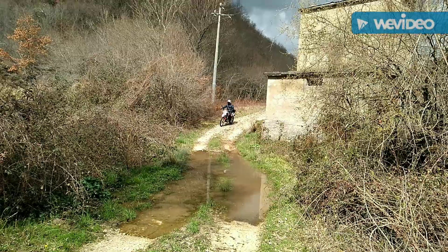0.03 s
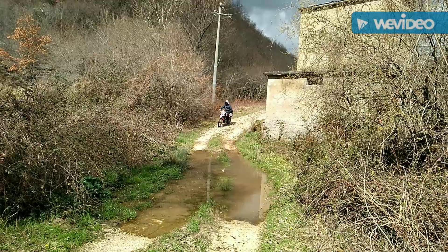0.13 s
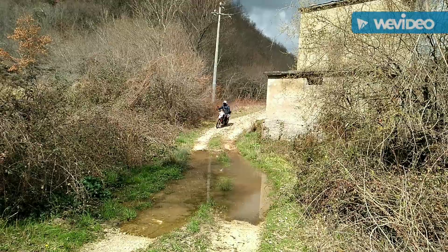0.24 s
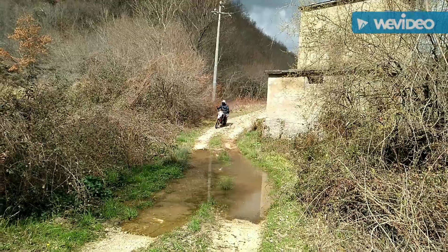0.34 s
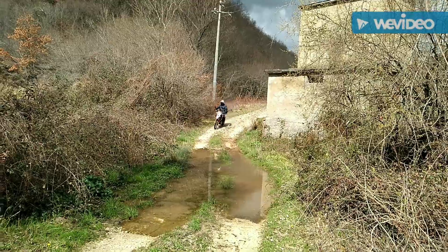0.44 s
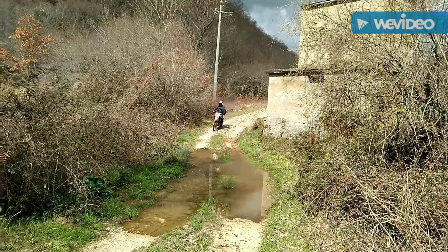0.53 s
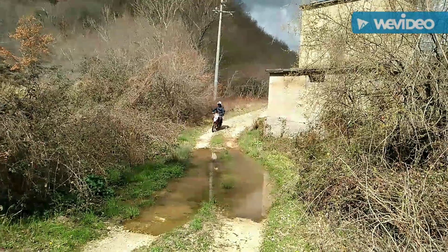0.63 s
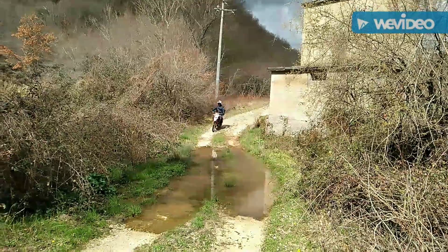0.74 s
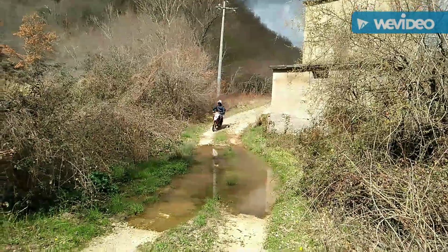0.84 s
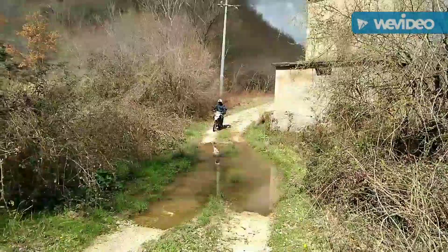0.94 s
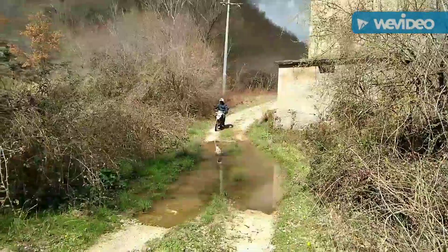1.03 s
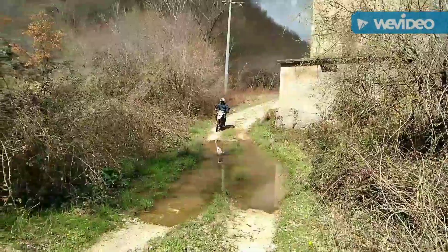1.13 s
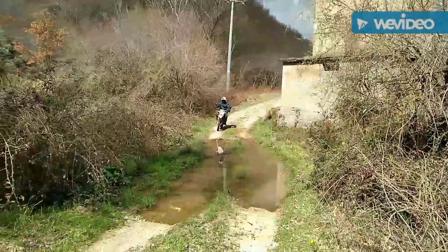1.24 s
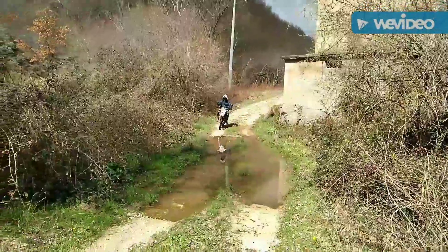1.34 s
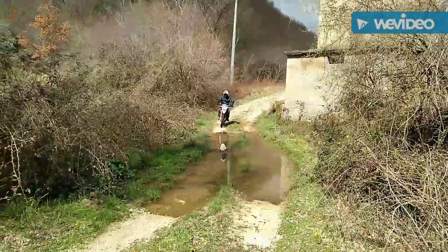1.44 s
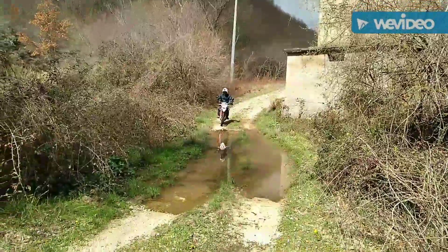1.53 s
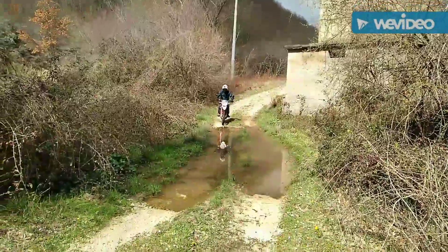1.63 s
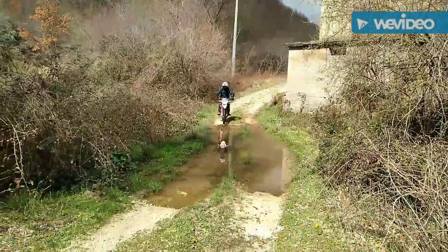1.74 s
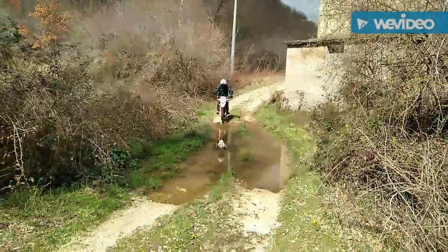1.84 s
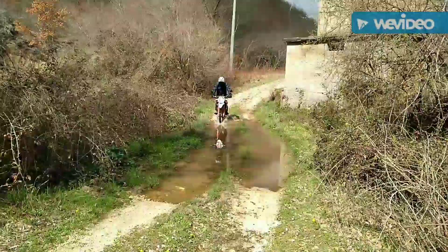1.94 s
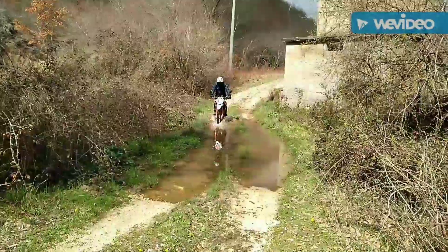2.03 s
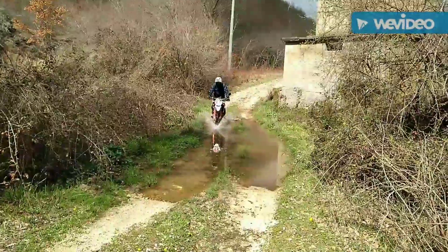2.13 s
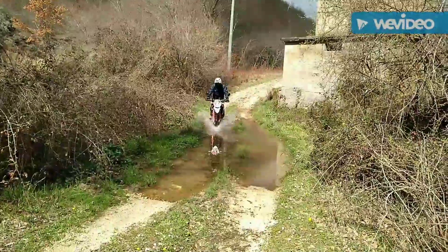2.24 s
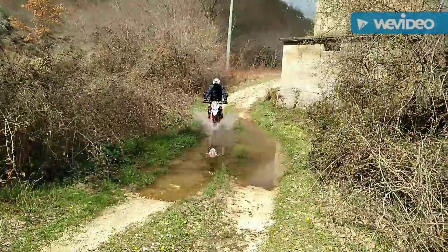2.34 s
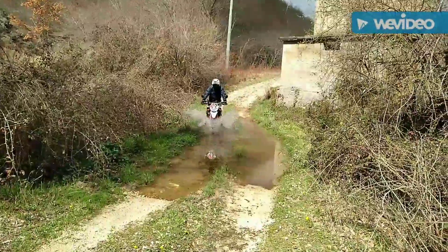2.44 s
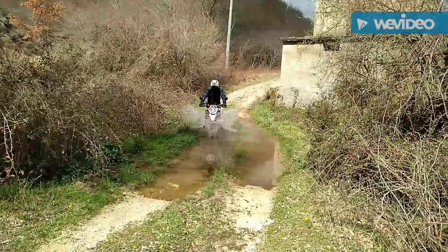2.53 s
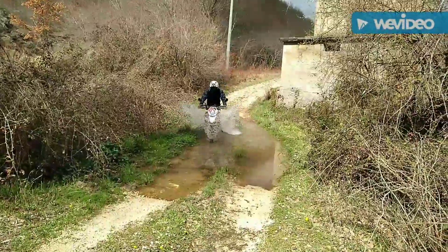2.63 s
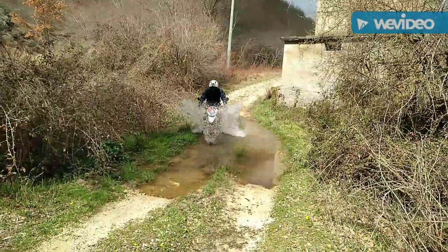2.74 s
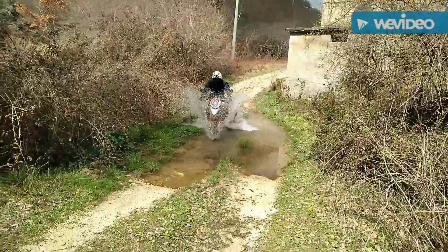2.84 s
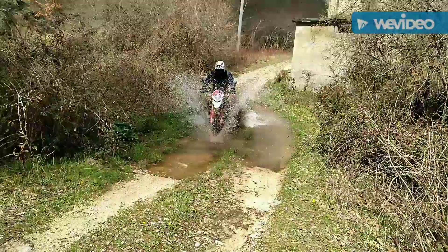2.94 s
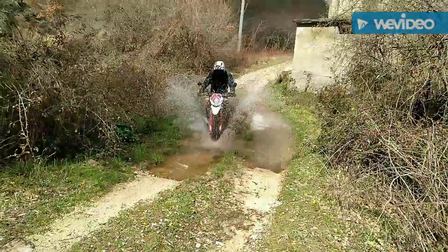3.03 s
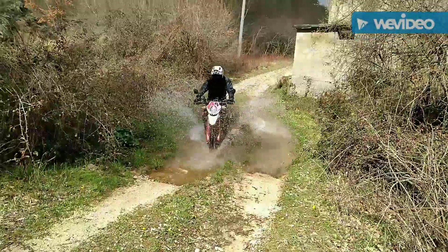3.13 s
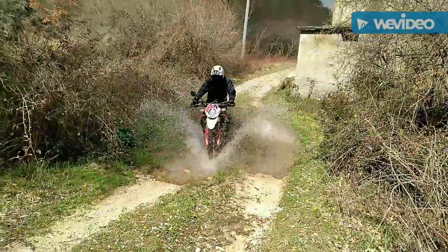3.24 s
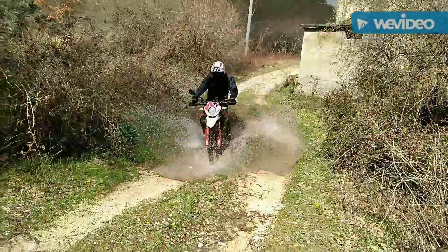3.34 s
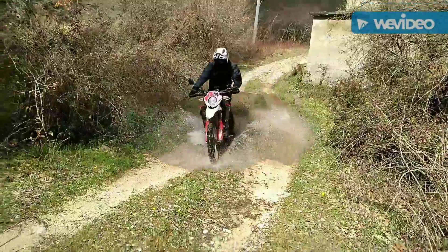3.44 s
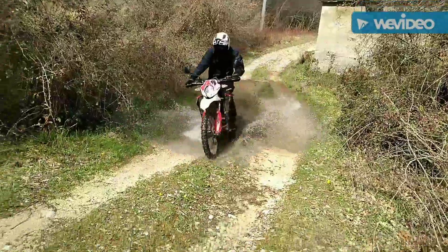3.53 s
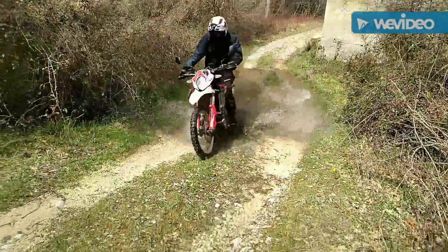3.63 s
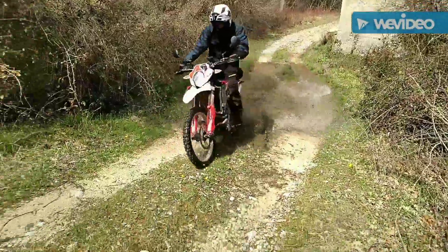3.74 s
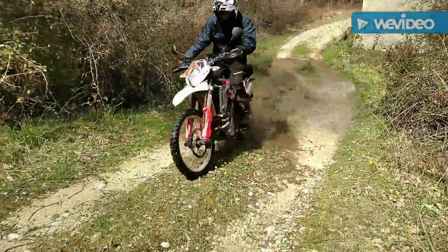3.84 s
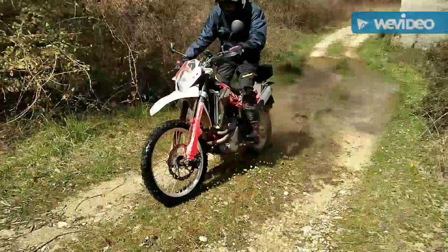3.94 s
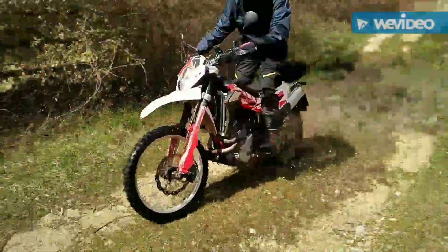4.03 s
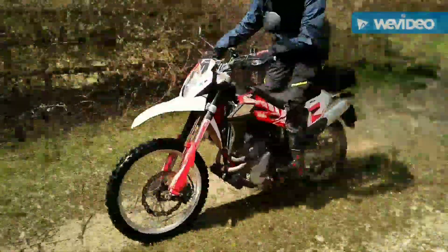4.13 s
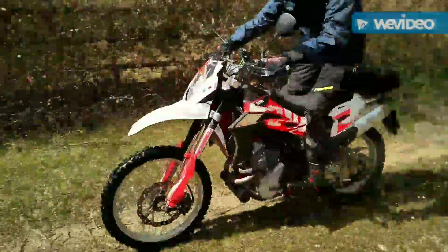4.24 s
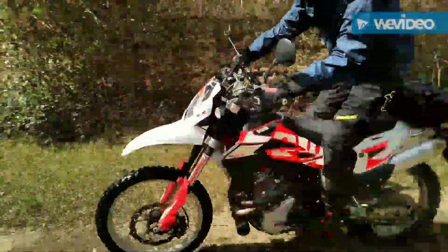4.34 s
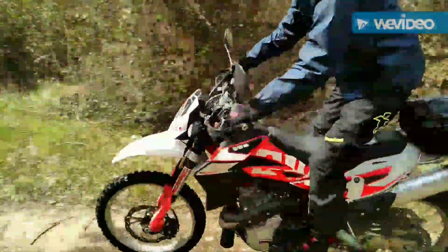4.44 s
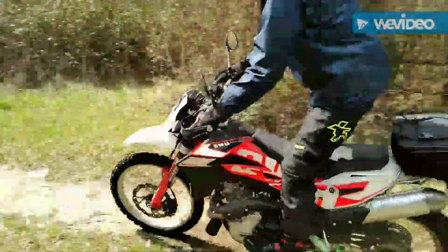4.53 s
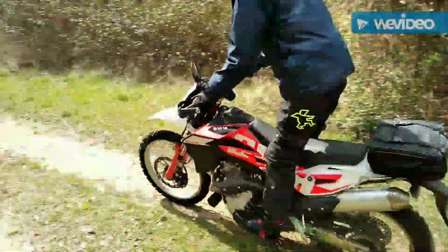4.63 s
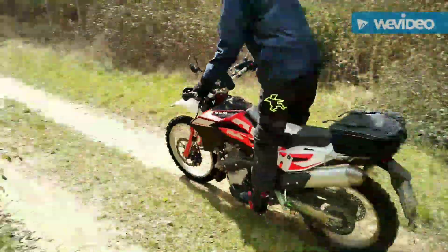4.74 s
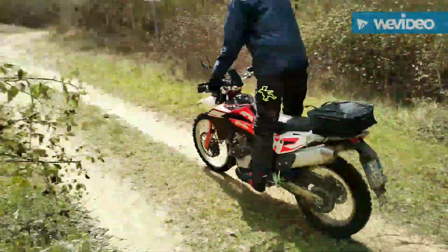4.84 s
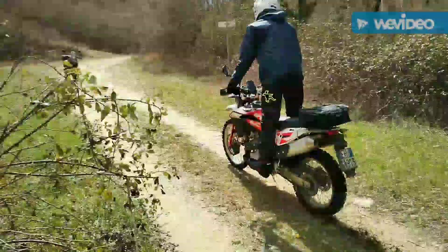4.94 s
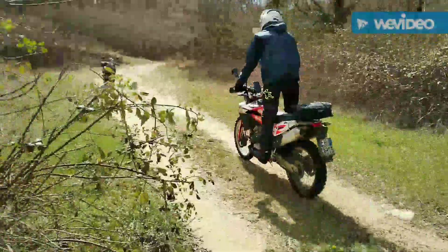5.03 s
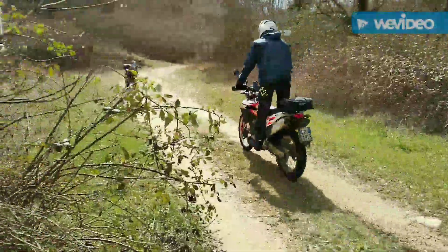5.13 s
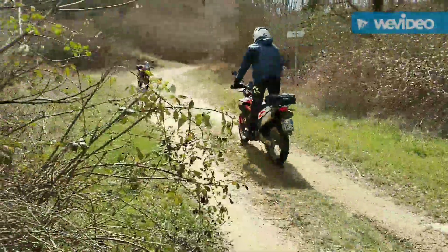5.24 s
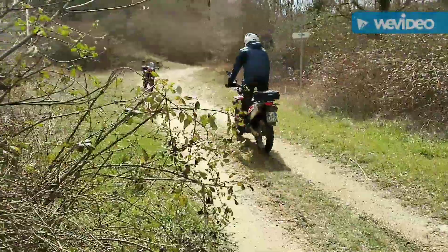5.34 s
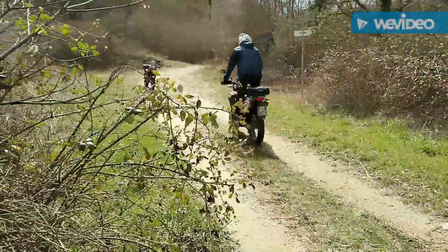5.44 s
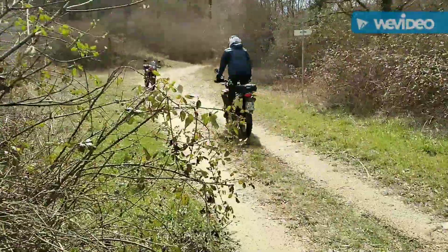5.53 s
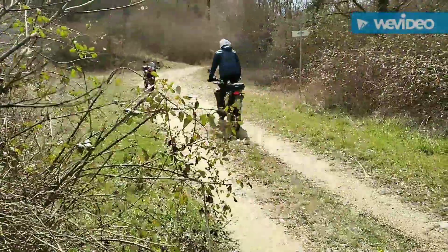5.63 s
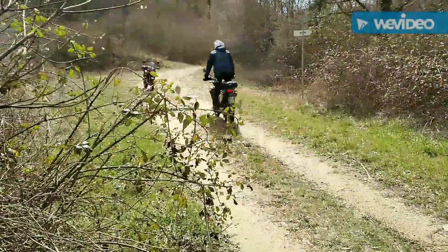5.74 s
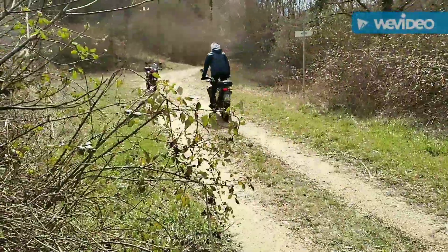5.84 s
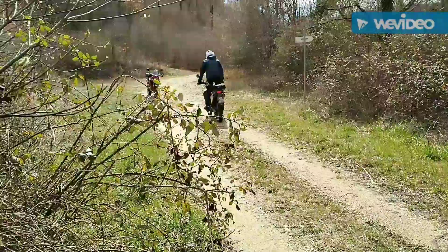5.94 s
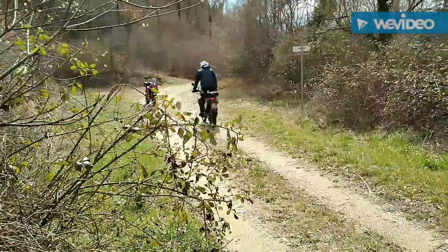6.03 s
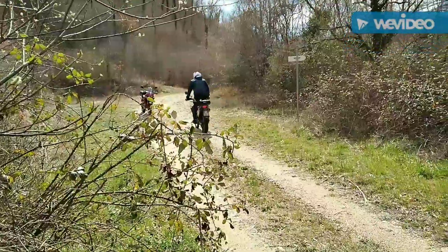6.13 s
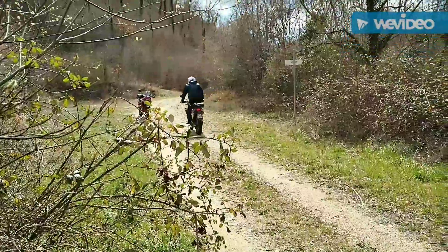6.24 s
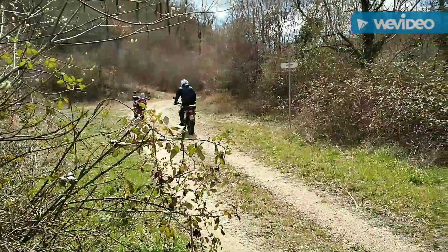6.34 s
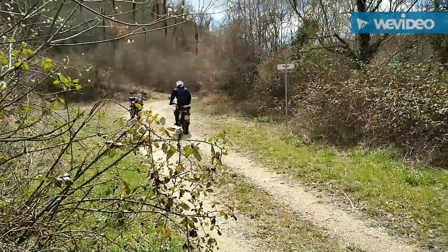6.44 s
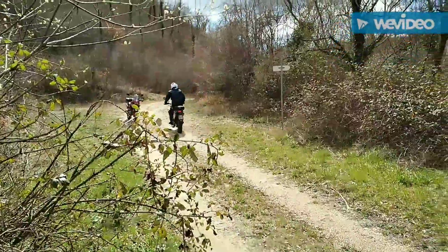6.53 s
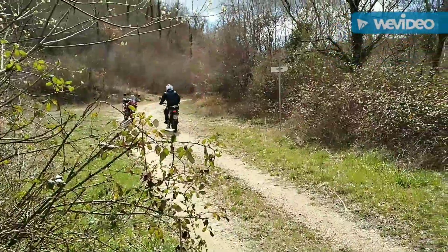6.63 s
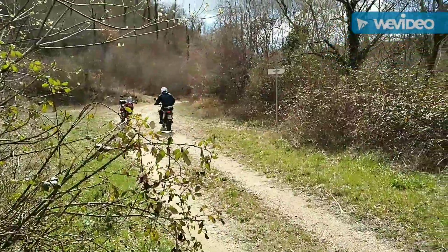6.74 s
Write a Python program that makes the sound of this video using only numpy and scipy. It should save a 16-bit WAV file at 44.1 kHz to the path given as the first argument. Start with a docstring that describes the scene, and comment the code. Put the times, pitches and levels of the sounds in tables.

```python
"""Trail motorcycle through a puddle

Beside a dirt track, open air, one microphone. A single-cylinder bike comes in from a distance, ploughs
through a long puddle, passes close and coasts away, throttle shut, firing unevenly. Each firing thumps
in the silencer, barks in the header pipe and clacks in the cylinder; unburnt gas pops in the tailpipe.
Underneath, engine and tyres drone, chain and valves rattle, spray and then grit hiss."""
import sys
import numpy as np
from scipy import signal
from scipy.fft import rfft, irfft
from scipy.io import wavfile

SR = 44100
rng = np.random.default_rng(int(sys.argv[2]) if len(sys.argv) > 2 else 0)


def dump_mix(stems):
    """Bounce the given channels to the path in sys.argv[1] as a 16-bit WAV at rate SR."""
    frames = np.atleast_2d(stems).T  # one column per channel
    limited = np.clip(frames, -1, 1)  # hard clip at full scale
    pcm = np.round(limited * 32767).astype(np.int16)
    wavfile.write(sys.argv[1], SR, pcm)


N = 299244

# Firings, heard from the trackside: t/s, thump level/dB, thump f/Hz, thump swell/ms,
# bark level/dB, relative clack level/dB
FIRINGS = [(0.067, -35.5, 93.6, 13, -54, -37.5), (0.107, -33, 99, 14, -34.5, -39.5),
           (0.155, -28.5, 114, 7.8, -31, -37.5), (0.193, -31, 113, 8.7, -35, -47),
           (0.232, -30, 114, 11, -35, -44), (0.27, -29, 115, 8.7, -36, -45),
           (0.308, -29, 112, 11.5, -38, -45), (0.354, -24.5, 97, 8.3, -60, -44),
           (0.4, -25.5, 93, 9, -47, -49), (0.428, -32.5, 125.4, 15, -46, -54),
           (0.494, -30, 99, 12, -34, -55), (0.549, -27, 103, 10.4, -37.5, -48),
           (0.604, -35, 101, 17, -52, -52), (0.66, -31, 92.5, 9.3, -49, -52),
           (0.708, -43, 77.6, 25, -63, -58), (0.79, -29, 107, 7.8, -36.5, -55),
           (0.857, -28.5, 104, 9.9, -36, -60), (0.925, -31, 109, 11.4, -35.5, -55),
           (0.995, -30, 107, 11.4, -35.5, -66), (1.063, -27, 101, 8.4, -34.5, -55),
           (1.126, -27, 102, 9.4, -34, -56), (1.181, -25.5, 100, 10.4, -31, -48),
           (1.236, -27, 104, 7.1, -30.5, -54), (1.3, -26.5, 99, 6.6, -34, -47),
           (1.359, -28, 101, 6.9, -30.5, -65), (1.42, -26, 106, 6.9, -32, -51),
           (1.478, -26, 100, 11.3, -29.5, -50), (1.539, -27.5, 102, 13, -29.5, -50),
           (1.598, -26, 101, 11, -32, -47), (1.658, -24, 103, 8.9, -31, -60),
           (1.718, -24.5, 103, 9, -30.5, -65), (1.777, -25.5, 102, 9.9, -29.5, -59),
           (1.836, -23.5, 99, 9.7, -29.5, -43), (1.897, -23, 97, 11.3, -29.5, -46),
           (1.956, -23, 95, 12.3, -28.5, -55), (2.018, -23, 94.5, 9.2, -29.5, -54),
           (2.079, -22, 91.5, 10.3, -28, -51), (2.138, -22.5, 95, 8.6, -27, -50),
           (2.197, -24, 107, 9.1, -27.5, -41), (2.252, -23, 109, 16, -23, -35),
           (2.306, -21, 105, 14, -25.5, -39), (2.361, -21, 104, 14, -24, -37.5),
           (2.416, -19.5, 101, 16, -23, -36), (2.467, -21, 97, 16, -27, -42),
           (2.521, -20, 95, 14, -22, -47), (2.576, -20, 99, 9, -26, -45), (2.632, -21, 105, 14, -23.5, -40),
           (2.684, -20.5, 107, 15, -21, -39), (2.735, -19, 104, 11.7, -22, -37),
           (2.788, -21.5, 104.6, 14, -21.5, -33), (2.838, -21, 102, 16, -22, -36),
           (2.89, -20, 100, 12.6, -24, -35), (2.942, -19.5, 99, 9.5, -25.5, -29.5),
           (2.996, -21, 100, 10.4, -23, -43), (3.049, -21, 103, 9, -22, -34),
           (3.105, -18.5, 105, 10, -24, -44), (3.159, -20.5, 101, 9.3, -22.5, -41),
           (3.217, -20.5, 100, 12, -21.5, -31), (3.274, -18.5, 97, 8.7, -22, -43),
           (3.333, -21, 100, 12, -21, -38), (3.389, -20, 97, 11.6, -22, -35),
           (3.445, -18.5, 104, 12, -19.5, -41), (3.496, -21, 102, 12, -18, -32),
           (3.546, -21.5, 100, 9.9, -21.5, -30.5), (3.6, -18.5, 97, 10, -20.5, -29),
           (3.656, -19.5, 102, 9.8, -20.5, -39), (3.709, -20, 99, 10, -22, -48),
           (3.765, -20.5, 99, 12.6, -21, -39), (3.821, -19.5, 108, 9, -20.5, -42),
           (3.875, -18.5, 100, 9.5, -18.5, -28.5), (3.927, -18.5, 109, 8.4, -21, -26),
           (3.977, -18, 108, 10, -18.5, -26), (4.025, -16, 114, 10, -19.5, -23.5),
           (4.073, -17.5, 108, 11.4, -20.5, -22), (4.12, -18.5, 107, 11.4, -20, -21),
           (4.167, -17, 104, 10, -19.5, -21), (4.212, -18, 102, 10, -19, -22),
           (4.261, -19.5, 103, 11, -19.5, -20), (4.308, -17.5, 105, 7.9, -22, -20),
           (4.354, -19.5, 107, 9.9, -21, -21.5), (4.401, -18, 110, 5.2, -27, -21),
           (4.442, -18, 106, 9.6, -29, -21), (4.491, -17.5, 115, 5.7, -28, -18.5),
           (4.534, -19, 110, 7.7, -22, -22.5), (4.582, -13.5, 116, 8.3, -26, -18),
           (4.628, -17.5, 111, 9.9, -24.5, -23), (4.674, -17, 109, 9.3, -25, -23.5),
           (4.717, -17, 111, 10.4, -24.5, -20.5), (4.764, -14.5, 109, 7.7, -27.5, -26),
           (4.806, -16, 109, 8.1, -24, -24.5), (4.85, -14.5, 107, 7.8, -25, -25),
           (4.897, -16, 109, 8.9, -23.5, -25), (4.941, -14, 113, 6.7, -22.5, -23.5),
           (4.984, -19, 115, 11, -19, -24.5), (5.023, -16, 119, 7.6, -22, -26),
           (5.059, -18, 119, 8.5, -23.5, -26), (5.096, -15.5, 117, 10, -31, -24),
           (5.135, -13.5, 116, 7.8, -26, -27), (5.174, -14.5, 115, 8.1, -25, -26),
           (5.214, -12.5, 114, 7, -31, -29.5), (5.253, -14, 107, 10.7, -30, -42),
           (5.314, -13, 91, 14, -60, -37), (5.362, -15, 89.6, 14, -60, -41),
           (5.424, -24, 98, 6.6, -62, -39), (5.465, -26, 109, 14, -50, -41),
           (5.511, -18, 93, 13.5, -60, -36), (5.559, -18.5, 89, 14.3, -60, -33.5),
           (5.601, -16, 125, 9.7, -60, -38.5), (5.654, -18.5, 92, 12, -60, -34.5),
           (5.703, -19, 91, 11.5, -60, -35), (5.748, -16, 96, 8, -25, -33.5),
           (5.798, -23.5, 95, 15, -60, -40), (5.859, -25.5, 93, 9.3, -60, -40),
           (5.899, -35, 111, 12, -60, -48), (5.95, -30, 152, 6.7, -43, -42.5),
           (6.0, -25.5, 93, 14.6, -60, -42), (6.052, -30, 94, 17, -48, -42),
           (6.098, -17.5, 121, 9.1, -59, -38), (6.159, -44, 112, 12, -57.5, -58),
           (6.211, -30.5, 82, 9.5, -43, -42.5), (6.266, -30, 83, 9.7, -60, -40.5),
           (6.314, -20.5, 114, 11.6, -52, -38), (6.379, -31, 115, 10, -56, -50),
           (6.433, -33, 118, 10, -44, -51), (6.49, -48, 104, 15, -65, -54),
           (6.547, -37.5, 90, 13, -58, -61), (6.615, -46, 106, 8.7, -60, -55),
           (6.662, -29, 93, 13, -54, -57), (6.713, -28, 106, 14, -60, -52), (6.781, -35, 87, 13, -65, -60)]
# The bike passing the microphone: t/s, bark f/Hz, clack peak ahead of the firing/ms,
# thump onset ahead of the firing/ms, heard from behind/0-1, dulled by distance/0-1
PASS_BY = [(0, 237, 8.3, 4.5, 0.08, 0.58), (1.9, 233, 5.8, 5.1, 0.08, 0.36),
           (2.4, 215, 10, 4.4, 0.05, 0.37), (3.5, 216, 10.8, 3.8, 0.07, 0), (4.0, 223, 10.1, 3.8, 0.2, 0),
           (4.35, 210, 10.6, 4.2, 0.44, 0.13), (4.5, 268, 7.4, 5.1, 0.35, 0.05),
           (4.85, 275, 11.4, 4.7, 0.74, 0), (4.95, 214, 3.8, 3.3, 0.52, 0), (5.27, 212, 6, 4.4, 0.6, 0.05),
           (5.29, 197, 7.9, 16.9, 0.96, 0), (6.8, 200, 6, 15.5, 0.86, 0.48)]
# Modes a clack rings: f/Hz, width/Hz, relative level/dB from the front, the same from behind
CLACK_MODES = [(657, 210, -5, -2.5), (940, 200, -8.5, 1), (1450, 115, -0.5, -4), (1784, 180, -2, 2),
               (2095, 440, -5.5, -7.5), (3300, 350, -3.5, -18.5), (4180, 360, -4, -5),
               (5870, 1600, -22.5, -9), (7300, 1100, -2, -10), (9500, 1100, -16.5, -5)]
# Hollow pops in the tailpipe: t/s, peak level/dB, f/Hz
TAILPIPE_POPS = [(0.139, -35.5, 1580), (4.933, -24.5, 515), (5.228, -22.5, 717), (5.305, -30.5, 550),
                 (5.353, -29.5, 640), (5.502, -30.5, 686), (5.592, -30, 900), (5.693, -36, 860),
                 (5.738, -37.5, 760), (6.089, -35, 940), (6.187, -34, 668), (6.567, -37.5, 630)]
# Rolling noise at the microphone: t/s, drone level/dB, rattle level/dB, hiss level/dB
ROLLING_LEVELS = [(0.07, -53, -53, -51), (0.15, -50.5, -48, -45.5), (0.25, -51, -48, -53),
                  (0.33, -48.5, -50, -50), (0.45, -55.5, -53.5, -53.5), (0.7, -54.5, -57.5, -54.5),
                  (0.95, -54.5, -59.5, -54.5), (1.18, -52.5, -58.5, -51), (1.4, -53.5, -55.5, -53),
                  (1.7, -50.5, -54.5, -52), (1.925, -50.5, -55, -49), (1.945, -50, -61, -36.5),
                  (1.975, -49, -48, -33.5), (2.01, -53, -51, -38.5), (2.06, -46.5, -49, -33),
                  (2.1, -49, -48, -42), (2.15, -46, -52, -32), (2.21, -42.5, -44, -36.5),
                  (2.3, -46, -45, -38), (2.36, -43, -38.5, -34), (2.45, -41, -40.5, -37),
                  (2.6, -40.5, -44.5, -36), (2.8, -37.5, -40.5, -38.5), (3, -38.5, -42, -33),
                  (3.2, -36, -37, -33), (3.27, -39.5, -39.5, -35), (3.35, -36.5, -38, -32.5),
                  (3.55, -37, -38, -32.5), (3.7, -35.5, -39.5, -32), (3.85, -37.5, -38, -33.5),
                  (4, -37, -37, -33), (4.15, -36, -36.5, -34), (4.3, -34.5, -33.5, -33),
                  (4.45, -35, -32, -32), (4.55, -38, -36.5, -34), (4.7, -35.5, -36, -35),
                  (4.85, -37.5, -32.5, -36), (4.95, -32.5, -37, -35.5), (5.05, -30.5, -33, -36),
                  (5.15, -31.5, -34.5, -38), (5.22, -35.5, -38, -39.5), (5.245, -36.5, -45, -42),
                  (5.27, -43, -48, -48.5), (5.33, -47, -46.5, -46), (5.42, -45, -51, -49),
                  (5.48, -49, -41.5, -47.5), (5.53, -48, -49.5, -49), (5.65, -48, -49.5, -51.5),
                  (5.8, -50, -52, -49.5), (5.9, -50.5, -53, -53.5), (6.05, -53.5, -52.5, -54),
                  (6.2, -49.5, -56, -54.5), (6.35, -52.5, -56, -58), (6.55, -54, -58.5, -60.5),
                  (6.78, -53.5, -60, -59)]
# Spectra of the rolling noise, each: f/Hz, relative level/dB
DRONE_FRONT_SPECTRUM = [(150, 7), (300, -10.5), (400, -4), (550, -1), (750, -13.5), (1050, -4.5),
                        (1300, -19), (2000, -33)]   # engine and tyres, coming
DRONE_REAR_SPECTRUM = [(150, -29), (250, 0), (350, -17), (480, -7), (640, -0.5), (780, -3), (900, -3),
                       (1200, -15), (2000, -27)]   # engine and tyres, going away
RATTLE_SPECTRUM = [(700, -52), (1100, -5.5), (1600, -2.5), (2200, -7), (2600, -16.5), (3200, -14)]             # chain and valve gear
SPRAY_SPECTRUM = [(1500, -0.5), (2300, -6.5), (2700, -9.5), (3300, -2.5), (4260, -1), (4700, -6),
                  (5400, -9), (7360, 0.5), (8900, -6.5), (10200, -5), (13100, -9), (14200, -5)]                # puddle water
GRIT_SPECTRUM = [(1500, -34), (2600, -5), (4200, -3), (5600, -4), (7700, -1.5), (11700, -7), (14200, 1)]                 # dry track

LEAD_IN = SR // 36   # samples laid down ahead of each firing


def engine():
    """The single cylinder, firing by firing, its tone changing as it passes the microphone."""
    times, thump_db, thump_hz, swell_ms, bark_db, clack_db = np.transpose(FIRINGS)[:, :, None]
    path_times, *path = np.transpose(PASS_BY)
    bark_hz, lead_ms, rise_ms, behind, _ = (np.interp(times, path_times, column) for column in path)
    t = (np.arange(SR // 7) - LEAD_IN) / SR
    exhaust = silencer_thump(t, thump_db, thump_hz, rise_ms, swell_ms)
    exhaust += header_bark(t, bark_db, bark_hz, rise_ms)
    return lay(times, exhaust, LEAD_IN) + cylinder_clacks(times, t, clack_db, lead_ms, behind)


def silencer_thump(t, level_db, hz, rise_ms, swell_ms):
    """A firing rings the silencer on one low note; off the throttle the onset is rounder."""
    roundness = np.maximum(rise_ms / 6.2, 1)
    return from_db(level_db) * swell(t, rise_ms, swell_ms, roundness) * np.cos(2 * np.pi * hz * t)


def header_bark(t, level_db, hz, rise_ms, knock_hz=323):
    """A firing rings two modes of the header pipe: a bark and a shorter, higher knock."""
    bark = swell(t, rise_ms - .6, swell_ms=4.84, power=1.45) * np.cos(2 * np.pi * hz * t)
    knock = swell(t, rise_ms - 1.5, swell_ms=2.7, power=1.6) * np.cos(2 * np.pi * knock_hz * t)
    return from_db(level_db) * bark + from_db(level_db - 11) * knock


def cylinder_clacks(times, t, level_db, lead_ms, behind, swell_ms=3.48):
    """A short burst of noise in the cylinder at each firing, favouring other modes each time."""
    burst = swell(t, lead_ms + swell_ms, swell_ms, power=0.74)[:, :SR // 15]
    scatter_db = rng.normal(0, 4.5, (len(times), len(CLACK_MODES)))
    out = np.zeros(N)
    for k, (hz, width_hz, front_db, rear_db) in enumerate(CLACK_MODES):
        mode_db = level_db - 9.5 + front_db + behind * (rear_db - front_db) + scatter_db[:, k:k + 1]
        envelope = lay(times, from_db(mode_db) * burst, LEAD_IN)
        out += resonance(envelope * rng.standard_normal(N) + 1e-18, hz, width_hz)
    return out


def tailpipe_pops():
    """Unburnt gas goes off in the tailpipe: a short ring on one pitch."""
    times, peak_db, hz = np.transpose(TAILPIPE_POPS)[:, :, None]
    t = np.arange(SR // 20) / SR
    rings = from_db(peak_db) * swell(t, 0, swell_ms=1.85) * np.sin(2 * np.pi * hz * t)
    return lay(times, rings, 0)


def rolling():
    """The bed under the firings: drone, rattle of chain and valve gear, and hiss from the track."""
    drone_db, rattle_db, hiss_db = in_time(ROLLING_LEVELS)
    *_, behind, dull = (np.clip(column, 0, 1) for column in in_time(PASS_BY))
    throb = crank_throb(behind)
    drone = running_drone(behind, throb)
    rattle = coloured(grainy(per_s=500, spread_db=2, smooth=1.4), RATTLE_SPECTRUM, flicker_db=1.5)
    hiss = spray_and_grit(behind, dull)
    return from_db(drone_db) * drone + from_db(rattle_db) * rattle * np.sqrt(throb) + from_db(hiss_db) * hiss


def crank_throb(behind, depth_db=1):
    """A gain that swings once a crank turn, two turns to a firing, deepest from behind."""
    turns = 2 * np.interp(np.arange(N) / SR, np.array(FIRINGS)[:, 0], np.arange(len(FIRINGS)))
    return from_db(depth_db * behind * np.cos(2 * np.pi * (turns - .1)))


def running_drone(behind, throb):
    """Engine and tyres drone: deep on the approach, higher and throbbing once past the microphone."""
    front = coloured(grainy(per_s=400, spread_db=1.5, smooth=1.86), DRONE_FRONT_SPECTRUM, flicker_db=1.5)
    rear = coloured(grainy(per_s=300, spread_db=2.5, smooth=1.4), DRONE_REAR_SPECTRUM, flicker_db=1.5)
    return (1 - behind) * front + np.sqrt(1 - (1 - behind) ** 2) * rear * throb


def spray_and_grit(behind, dull, distant_cut_hz=11500):
    """Tyres throw up water, then grit as the puddle is left behind; distance takes off the top."""
    spray = coloured(grainy(per_s=4000, spread_db=3.5, smooth=1.94), SPRAY_SPECTRUM, flicker_db=1.65)
    grit = coloured(grainy(per_s=4400, spread_db=2.5, smooth=3.5), GRIT_SPECTRUM, flicker_db=2.4)
    near = np.sqrt(1 - behind ** 2) * spray + behind * grit
    distant = signal.sosfilt(signal.butter(3, distant_cut_hz, fs=SR, output="sos"), near)
    return near + dull * (distant - near)


def from_db(db):
    return 10 ** (np.asarray(db) / 20)


def rms_one(x):
    return x / np.sqrt(np.mean(x ** 2) + 1e-20)


def in_time(rows):
    """One curve per column after t/s, sample by sample."""
    times, *columns = np.transpose(rows)
    return [np.interp(np.arange(N) / SR, times, column) for column in columns]


def drift(hz):
    """Slow random wander: coarse noise through a double one-pole low-pass, rms 1."""
    r = np.exp(-80 * np.pi * hz / SR)
    slow = signal.lfilter([1], [1, -2 * r, r * r], rng.standard_normal(N // 40 + 2002))[2000:]
    return np.interp(np.arange(N) / 40, np.arange(len(slow)), rms_one(slow))


def coloured(source, spectrum, flicker_db):
    """Shapes a source by a spectrum; half octaves flicker partly alone, partly together; rms 1."""
    hz = np.maximum(np.fft.rfftfreq(N, 1 / SR), 1)
    points_hz, db = np.transpose(spectrum)
    shaped = rfft(source) * from_db(np.interp(np.log(hz), np.log(points_hz), db, left=-70, right=-70))
    half_octave = 2 * np.log2(hz)
    together = drift(hz=28)
    out = 0
    for band in range(int(2 * np.log2(points_hz[0])), int(2 * np.log2(points_hz[-1])) + 2):
        window = np.clip(1 - abs(half_octave - band), 0, 1)   # neighbouring windows add up to one
        out += irfft(shaped * window, N) * from_db(flicker_db * (0.33 * together + drift(hz=28)))
    return rms_one(out)


def grainy(per_s, spread_db, smooth):
    """Random clicks of uneven size over smooth noise."""
    sizes = from_db(spread_db * np.minimum(rng.exponential(1, N), 5)) * rng.choice([-1, 1], N)
    clicks = sizes * (rng.random(N) < per_s / SR)
    return rms_one(clicks) + smooth * rng.standard_normal(N)


def swell(t, early_ms, swell_ms, power=1):
    """Pressure starts early_ms before t = 0, builds to 1 over swell_ms and leaks away."""
    u = np.maximum(1000 * t + early_ms, 0) / np.maximum(swell_ms, 1)
    return (u * np.exp(1 - u)) ** power


def lay(times, shapes, lead_in):
    """Adds one shape per event to the time line, starting lead_in samples early."""
    out = np.zeros(N)
    at = np.round(times * SR).astype(int) + np.arange(shapes.shape[1]) - lead_in
    inside = (at >= 0) & (at < N)
    np.add.at(out, at[inside], shapes[inside])
    return out


def resonance(x, hz, width_hz):
    """Two-pole band-pass; white noise keeps its rms."""
    r = np.exp(-np.pi * width_hz / SR)
    gain = np.sqrt((1 - r * r) / 2)
    return signal.lfilter([gain, 0, -gain], [1, -2 * r * np.cos(2 * np.pi * hz / SR), r * r], x)


def scene():
    """The motorcycle from the trackside, in open air, mono."""
    return (engine() + tailpipe_pops() + rolling())[None, :]


def record(dry):
    """The microphone opens just after the start, rounds peaks and lacks deepest bass and highest treble."""
    open_s, low_cut_hz, high_cut_hz, ceiling = 0.062, 32, 14300, 0.58
    opened = np.clip((np.arange(N) / SR - open_s) / .003, 0, 1)
    thin = signal.sosfilt(signal.butter(2, low_cut_hz, "high", fs=SR, output="sos"), dry * opened)
    rounded = ceiling * np.tanh(thin / ceiling)
    return signal.sosfilt(signal.cheby2(14, 70, high_cut_hz, fs=SR, output="sos"), rounded)


dry = scene()
out = record(dry)
dump_mix(out)
```